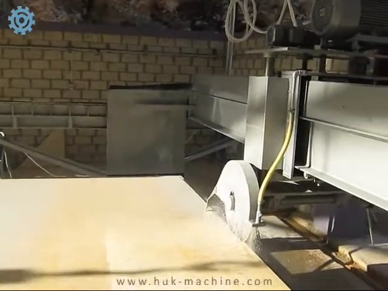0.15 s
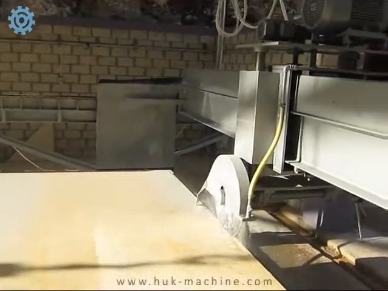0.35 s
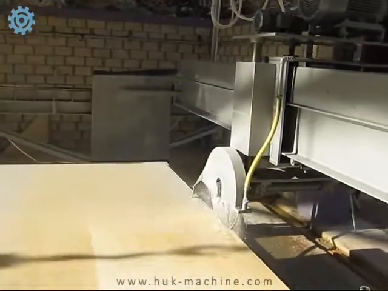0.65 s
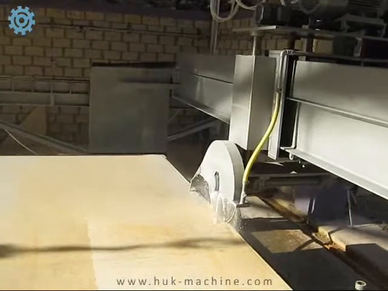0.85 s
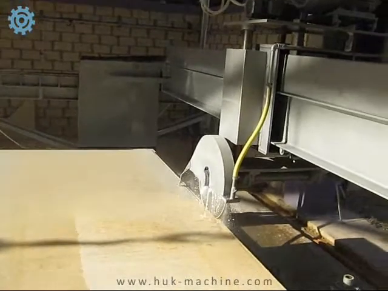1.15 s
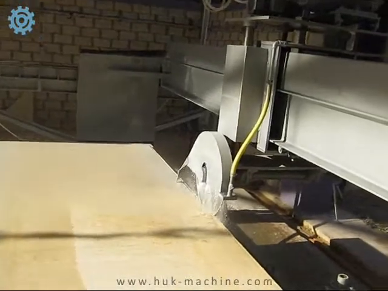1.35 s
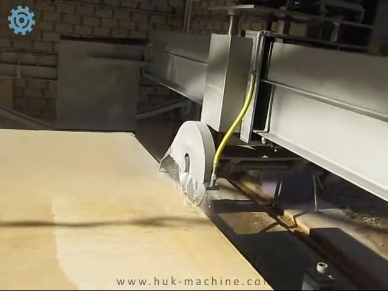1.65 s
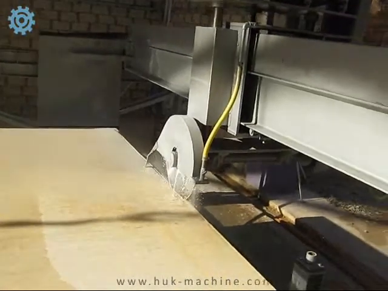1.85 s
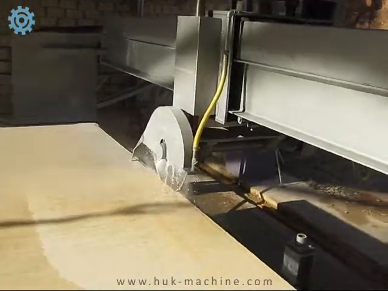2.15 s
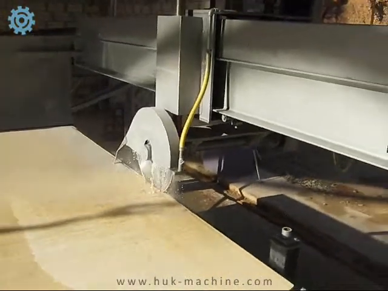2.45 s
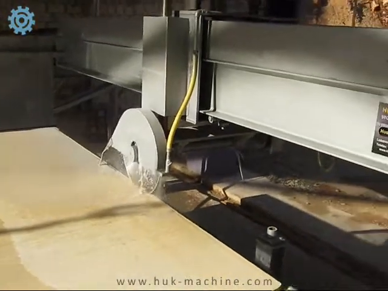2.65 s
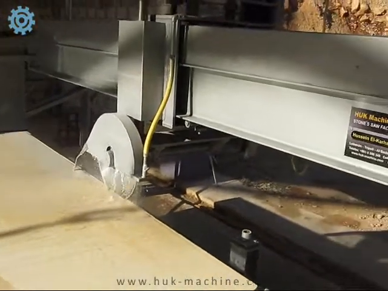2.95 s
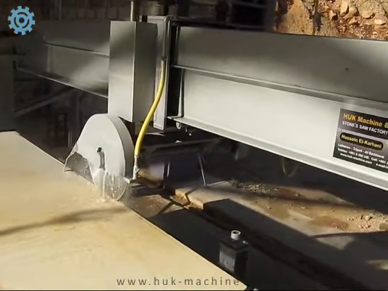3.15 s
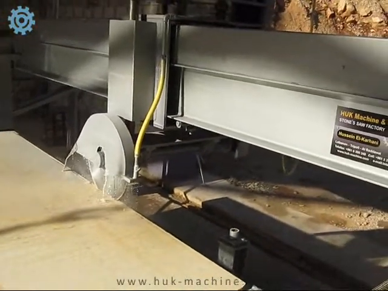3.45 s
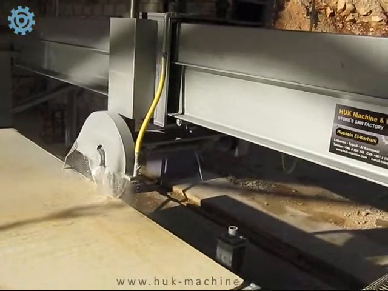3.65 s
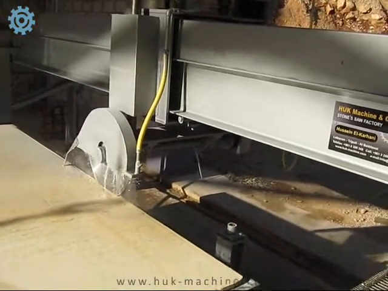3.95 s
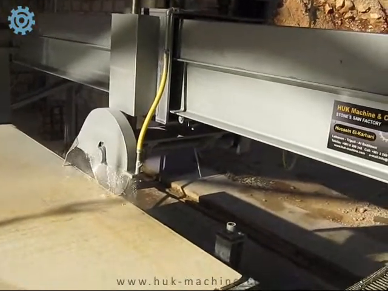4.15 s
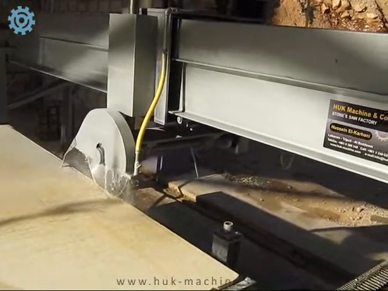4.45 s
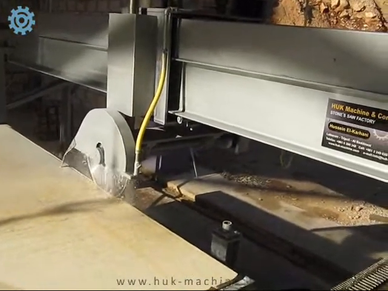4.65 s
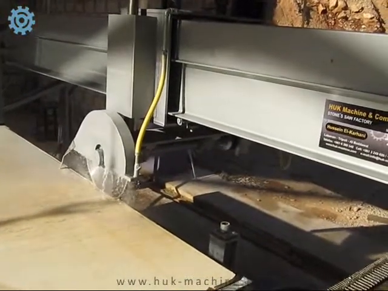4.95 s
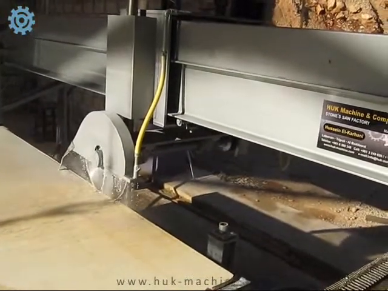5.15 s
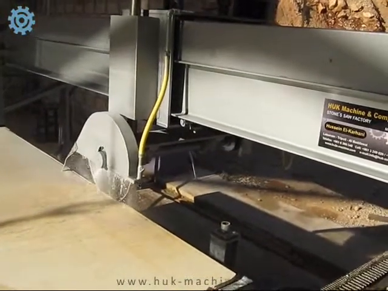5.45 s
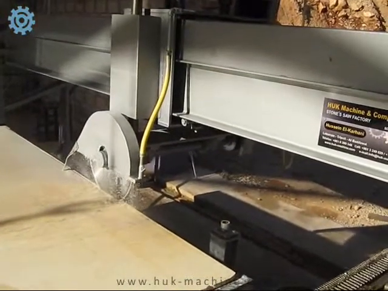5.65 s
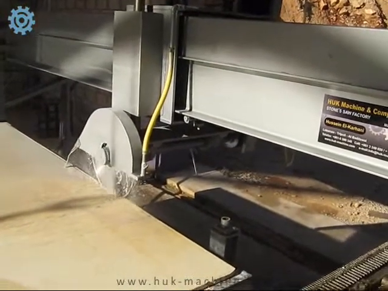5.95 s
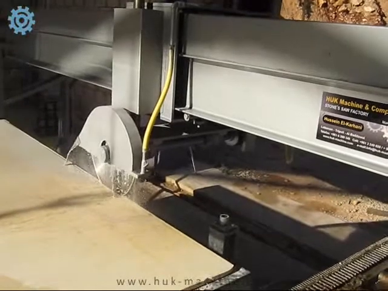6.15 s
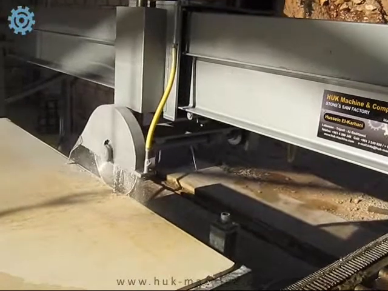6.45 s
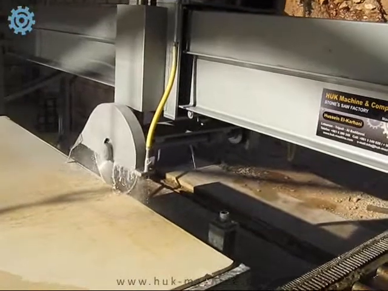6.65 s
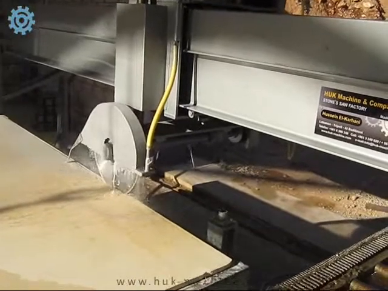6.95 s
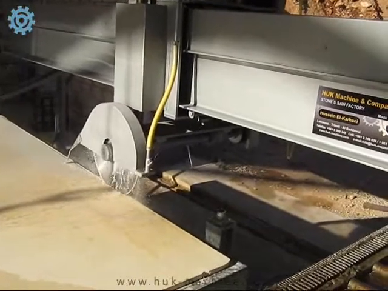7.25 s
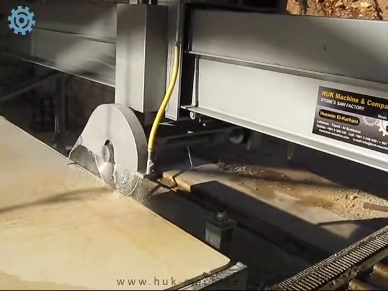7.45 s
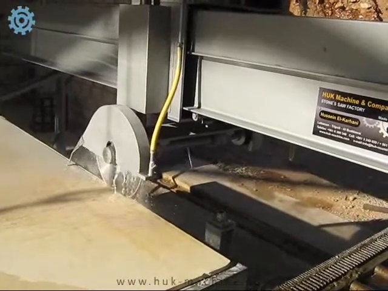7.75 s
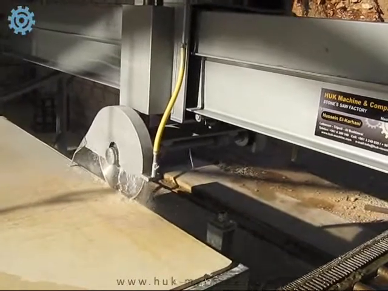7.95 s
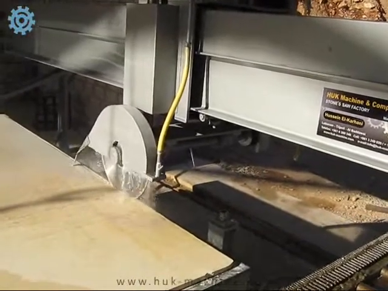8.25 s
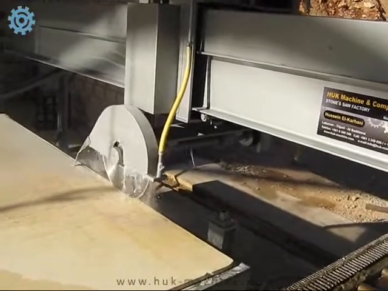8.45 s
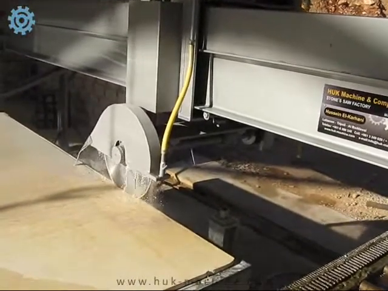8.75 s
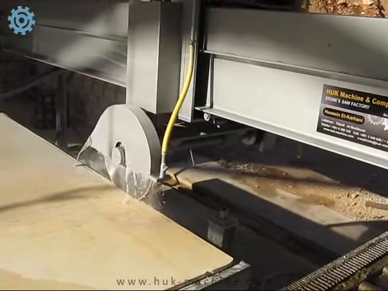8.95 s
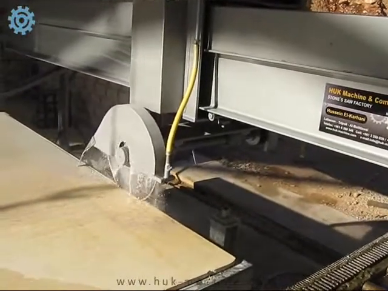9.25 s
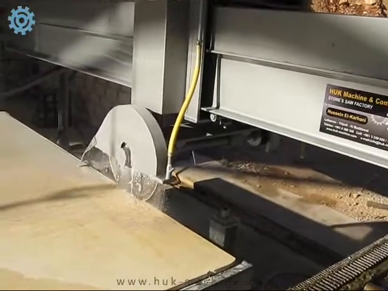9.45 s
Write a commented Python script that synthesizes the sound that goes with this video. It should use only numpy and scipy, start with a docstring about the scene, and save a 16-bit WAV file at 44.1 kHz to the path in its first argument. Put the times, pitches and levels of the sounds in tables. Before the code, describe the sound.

A water-cooled circular saw grinds through a stone slab for the whole stretch of about nine and a half seconds, heard from a microphone moving nearby in a workshop. The main sound is a bright, gritty rasp mixed with the high, rapidly fluttering ring of the steel disc, almost constant in level. The blade now and then catches in thin squeals that swell and fade within the grinding: around 0.3 seconds, 2.5, several between 4 and 5, the clearest near 6, another at 6.5, and an overlapping run from 7.4 to the end. Underneath, motor and spindle drone steadily, their individual tones slowly rising and falling in loudness. Cooling water adds an even, spraying rush throughout. Drone and water grow slightly louder from about 8 seconds. The treble has a slightly harsh, coarse edge, and the cutting never stops.

```python
"""A stone workshop, with a hand-held camera's microphone moving near a water-cooled bridge saw.
The saw grinds steadily through a slab. Each turn of the blade scrapes almost the same grit as the last,
so the steel disc rings in a comb of the turn rate, and now and then it catches and squeals.
Motor and spindle drone underneath, their tones swelling as the microphone crosses standing waves.
Cooling water washes over it all, and the camera's coarse, low-rate sampling adds a bright edge."""
import sys
import numpy as np
from scipy import signal
from scipy.fft import rfft, irfft
from scipy.io import wavfile
from scipy.ndimage import uniform_filter1d, map_coordinates

SR = 44100
rng = np.random.default_rng(int(sys.argv[2]) if len(sys.argv) > 2 else 0)


def generate_wav(sig):
    """Save sig (samples, or channels by samples) to the path in sys.argv[1] as 16-bit PCM at SR."""
    pcm = np.round(np.clip(np.atleast_2d(sig).T, -1, 1) * 32767).astype(np.int16)
    wavfile.write(sys.argv[1], SR, pcm)


N = 422904
TIME = np.arange(N) / SR
FREQ = np.fft.rfftfreq(N, 1 / SR)


def blade(turns, pressure, split_hz=2740, segment_hz=3800, rim_db=7.5, sides_db=-5.5):
    """The rim grinds the kerf and rings the upper modes; the disc's rubbing sides ring the low ones."""
    # how hard the rim bites, driving rasp and ringing alike: (time [s], relative level [dB])
    bite = [(0.0, -24), (1.44, -23), (1.52, -25.5), (1.55, -23), (3.47, -24), (3.5, -22.5), (3.76, -23),
            (3.9, -22.5), (5.05, -24), (6.81, -23.5), (7.18, -24), (7.69, -23), (8.97, -23.5),
            (9.05, -22.5), (9.13, -24.5), (9.59, -23.5)]
    # modes of the steel disc: (frequency [Hz], width [Hz], relative level [dB])
    disc_modes = [(2423, 20, -2.5), (2460, 37, -8), (2540, 90, -1.5), (2685, 200, -11.5), (2799, 39, -2.5),
                  (3046, 20, -2.5), (3096, 46, -7.5), (3252, 59, -6), (3299, 20, -3.5), (3350, 79, -2),
                  (3585, 38, -6), (3695, 66, -4.5), (4044, 200, -6.5), (4207, 31, -2.5), (4385, 80, -2.5),
                  (4550, 120, -5), (4640, 80, -3), (4861, 30, -2.5), (4942, 196, -4), (5168, 90, 0),
                  (5330, 90, -2)]
    # broad rasp of the stone between the modes: (frequency [Hz], relative level [dB])
    rasp = [(900, -48), (1750, -21), (2200, -15.5), (2450, -12), (2900, -9.5), (3500, -11), (4100, -10),
            (4750, -11.5), (5500, -10)]
    bite_db, = curves(bite)
    low = resonance([mode for mode in disc_modes if mode[0] < split_hz])
    middle = resonance([mode for mode in disc_modes if split_hz <= mode[0] < segment_hz])
    high = resonance([mode for mode in disc_modes if mode[0] >= segment_hz])
    # fine grit hisses evenly; proud segments of the rim strike the middle modes in bursts
    hiss = colour(scrape(turns, memory=0.58, share=0.76), np.hypot(high, slope(rasp)))
    segments = throb(turns, count=7, depth_db=2.0) * throb(turns, count=2, depth_db=-0.5)
    strikes = colour(scrape(turns, memory=0.69, share=0.52) * segments, middle)
    # the low modes die away fast, so their loudness follows the pressure on the sides
    ringing = colour(scrape(turns, memory=0.8, share=0.68), low) * pressure
    rim = unit(hiss + strikes) * undb(rim_db + 0.25 * walk(12))  # harder and softer grains
    sides = unit(ringing) * undb(sides_db + 0.46 * walk(6))  # the sides bind and come free
    return (rim + sides) * undb(bite_db)


def scrape(turns, memory, share, rim_points=1056):
    """Contact force: grit round the rim that wears from turn to turn, plus freshly breaking stone."""
    grit = rng.standard_normal((int(turns[-1]) + 20, rim_points))
    # memory: likeness of one turn to the next; share: the rim pattern's part of the power
    rim = signal.lfilter([np.sqrt(1 - memory ** 2)], [1, -memory], grit, axis=0).ravel()
    repeating = map_coordinates(rim, [(turns + 10) * rim_points], order=2)
    return np.sqrt(share) * repeating + np.sqrt(1 - share) * rng.standard_normal(N)


def shaft(turn_hz=41.77, drift=0.0005006, flutter=0.0004):
    """Turns done so far; the load pulls the speed very slightly."""
    return np.cumsum(turn_hz * (1 + drift * walk(2.5) + flutter * walk(30))) / SR


def rubbing(turns):
    """The warped, slightly off-centre disc presses on the kerf's sides twice a turn, one side harder."""
    return unit(throb(turns, count=2, depth_db=2.0) * throb(turns, count=1, depth_db=0.5))


def throb(turns, count, depth_db):
    """Contact pressure that rises count times a turn."""
    return undb(depth_db * np.sin(2 * np.pi * (count * turns + rng.random())))


def squeals(pressure, waver_rad=0.48, chatter_db=0.5):
    """Friction locks onto one mode of the disc, which swells to a chattering tone and dies away."""
    # the disc catches in the kerf: (peak time [s], length [s], frequency [Hz], level [dB])
    catches = [(0.332, 0.43, 2556, -27), (0.802, 1, 3680, -33), (1.2, 0.26, 2546, -31),
               (1.9, 0.67, 5240, -31), (2.5, 0.19, 3410, -29), (2.92, .15, 3290, -32),
               (3.997, 0.12, 2534, -28), (4.38, 0.28, 2544, -28), (4.764, 0.089, 3350, -26.5),
               (5.517, 0.27, 3375, -29.5), (5.956, 0.2, 2540, -24.5), (6.47, 0.16, 2556, -27),
               (7.39, 0.11, 3300, -25.5), (7.517, 0.29, 3080, -29.5), (7.54, 0.13, 2798, -29),
               (7.798, 0.48, 4390, -31.5), (8.3, 0.84, 3047, -32), (9.1, 0.56, 2450, -30.5),
               (9.15, 0.3, 4390, -31.5)]
    tones = 0
    for peak, length, hz, db in catches:
        swell = np.exp(-2 * ((TIME - peak) / length) ** 2)
        tones = tones + undb(db) * swell * np.sin(2 * np.pi * hz * TIME + waver_rad * walk(60))
    return np.sqrt(2) * tones * pressure * undb(chatter_db * walk(35))


def spindle(turns, fade_db=1.7, shake_db=0.55, wander_rad=1.0):
    """Clean tones on the shaft's orders; each shifts in level and phase among the room's reflections."""
    # steady tones of motor and spindle: (order [multiple of the turn rate], level [dB])
    orders = [(2, -57.5), (3, -63), (4, -57.5), (5, -59.5), (6, -54), (7, -55.5), (8, -50), (9, -63),
              (10, -50.5), (11, -57), (12, -50.5), (13, -47), (14, -53.5), (15, -53.5), (16, -46),
              (17, -48), (18, -46.5), (19, -53), (20, -49.5), (21, -49.5), (22, -47.5), (23, -49.5),
              (24, -62), (25, -51.5), (26, -51), (27, -52), (28, -59), (29, -50), (30, -51), (31, -46),
              (32, -47.5), (33, -58), (34, -53), (35, -48), (36, -50), (37, -57.5), (38, -53.5), (39, -50)]
    drone = 0
    for order, db in orders:
        usual_gain = unit(undb(fade_db * walk(1.076))) * undb(db)
        phase = 2 * np.pi * (round(order) * turns + rng.random()) + wander_rad * walk(1.225)
        drone = drone + standing_wave(order, usual_gain) * np.sin(phase)
    return np.sqrt(2) * drone * undb(shake_db * walk(14))


def standing_wave(order, gain, flatness=4):
    """One order's gain rises from its usual level to each broad crest that the microphone passes."""
    # crests along the microphone's path:
    # (middle time [s], length [s], order [multiple of the turn rate], crest level [dB])
    crests = [(0.6, 1.4, 26, -43.5), (1.1, 2.1, 36, -43), (1.1, 2.4, 17, -37), (1.55, 3.24, 6, -38.5),
              (1.7, 1.4, 18, -41.5), (2.4, 0.91, 13, -44), (2.65, 1.5, 20, -42), (2.9, 2.9, 19, -42),
              (3.3, 2.3, 10, -45), (3.8, 2.0, 23, -44), (4.7, 1, 17, -39.5), (5.3, 2.3, 15, -41.5),
              (6.75, 1.1, 34, -40.5), (6.9, 1.8, 20, -43), (7.0, 0.64, 17, -42.5), (8.7, 1.4, 17, -37.5),
              (8.8, 1.3, 13, -40.5), (9.0, 2, 15, -41.5), (9.0, 2.1, 6, -46)]
    for middle, length, crest_order, db in crests:
        if round(crest_order) == round(order):
            inside = 0.5 ** (np.abs(2 * (TIME - middle) / length) ** flatness)
            gain = gain + inside * (undb(db) - gain)
    return gain


def water(level_db=-29.5, drops_per_s=3000, drop_gain=0.26, flicker_db=0.9):
    """Thousands of drops flung off the rim patter on guard and slab, over a smooth rush."""
    # spectrum of cooling water and the machine's rush: (frequency [Hz], relative level [dB])
    wash = [(15, -13), (45, -7), (150, -4), (400, -2), (750, -1.5), (1050, -3), (1350, -0.5), (1800, -2.5),
            (5500, -6.5)]
    impacts = rng.standard_normal(N) * rng.exponential(size=N)
    drops = impacts * (rng.random(N) < drops_per_s / SR)
    spray = rng.standard_normal(N) + drop_gain * unit(drops)
    return unit(colour(spray, slope(wash))) * undb(level_db + flicker_db * walk(8.2))


def undb(db):
    """Decibels to gain."""
    return 10 ** (np.asarray(db) / 20)


def unit(x):
    """Scale to an rms of 1."""
    return x / np.sqrt(np.mean(x ** 2))


def curves(table):
    """Each column of a table, joined by straight lines in time."""
    times, *columns = np.transpose(table)
    return [np.interp(TIME, times, column) for column in columns]


def walk(rate_hz):
    """Random levels held 1 / rate_hz seconds and smoothed twice, at an rms of 1."""
    step = int(SR / rate_hz)
    held = np.repeat(rng.standard_normal(N // step + 1), step)
    return unit(uniform_filter1d(uniform_filter1d(held, step), step)[:N])


def slope(points):
    """Gain at every frequency from (frequency [Hz], level [dB]) points."""
    hz, db = np.transpose(points)
    return undb(np.interp(np.log(FREQ + 1), np.log(hz), db))


def resonance(modes):
    """Gain at every frequency of steep-sided resonances whose powers add."""
    peaks = (undb(db) / (1 + (2 * (FREQ - hz) / width) ** 2) for hz, width, db in modes)
    return np.sqrt(sum(peak ** 2 for peak in peaks))


def colour(x, gain):
    """Filter a sound by a gain at every frequency."""
    return irfft(rfft(x) * gain, N)


def scene():
    """The saw at the microphone, in mono: blade and spindle share one shaft, with water beside them."""
    # how strongly drone and water carry to the microphone's place: (time [s], gain [dB])
    nearness = [(0, -0.5), (2.8, 0.5), (4.8, -0.14), (7, 0.3), (8.3, 1), (9.59, 2.5)]
    near_db, = curves(nearness)
    turns = shaft()
    pressure = rubbing(turns)
    cutting = blade(turns, pressure) + squeals(pressure)
    background = (spindle(turns) + water()) * undb(near_db)
    return (cutting + background)[None]


def record(dry, hold=4, ceiling=0.36, top_hz=12750):
    """The camera samples at a low rate, rounds the peaks and holds each value."""
    samples = colour(dry, FREQ < SR / hold / 2)[:, ::hold]
    rounded = ceiling * np.tanh(samples / ceiling)
    stepped = np.repeat(rounded, hold, axis=1)[:, :N]  # the steps mirror the rasp into the treble
    steep_lowpass = 1 / np.hypot(1, (FREQ / top_hz) ** 120)
    return colour(stepped, steep_lowpass)


dry = scene()
out = record(dry)
generate_wav(out)
```